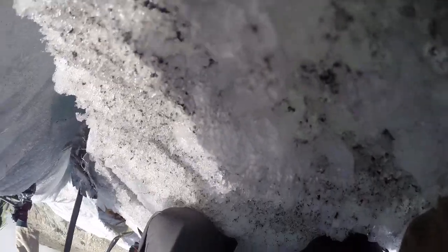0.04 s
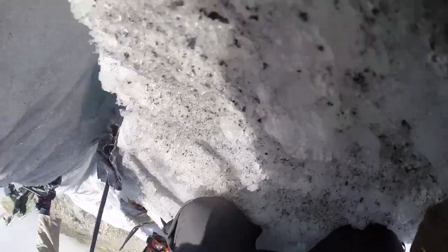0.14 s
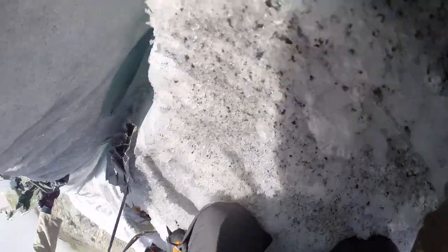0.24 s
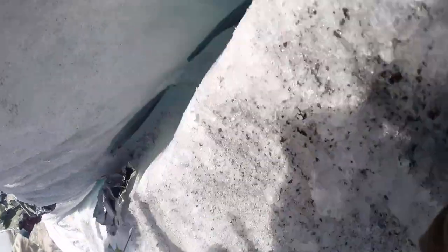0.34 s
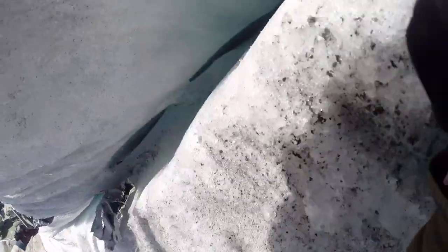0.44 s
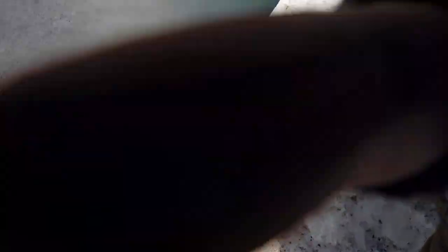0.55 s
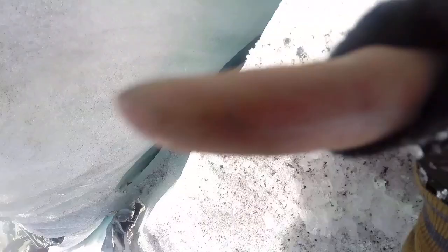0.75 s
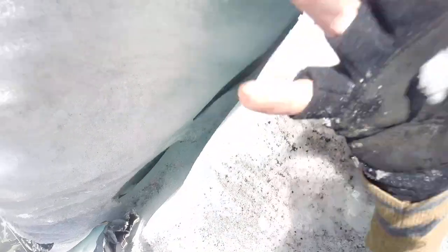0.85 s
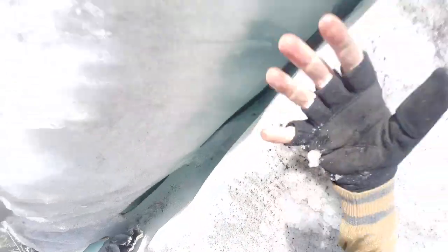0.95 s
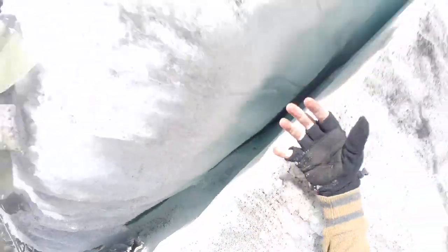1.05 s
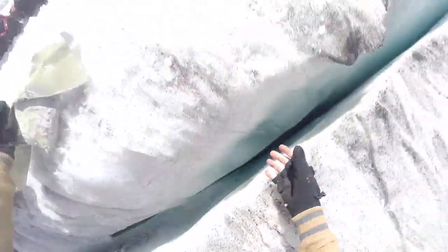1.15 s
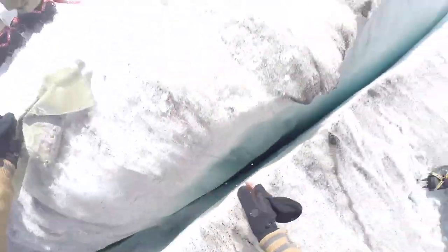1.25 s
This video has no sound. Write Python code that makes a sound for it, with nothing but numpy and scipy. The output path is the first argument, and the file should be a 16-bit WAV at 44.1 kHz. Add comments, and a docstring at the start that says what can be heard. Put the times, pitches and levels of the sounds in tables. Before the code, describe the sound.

Hollow plastic knocks rattle right against the microphone, outdoors on ice, with gritty snaps, dull bumps and a scraping glove. They follow a soft sleeve rustle and stop in under a second, leaving a faint wind rumble and distant hiss.

```python
"""On a glacier, a body-worn camera is jolted. A gloved hand and gear knock on its plastic case in quick,
clattering runs: each contact rings the shell, thuds, and snaps as grit is crushed, so close that the
hardest knocks overload. The jolts thump the microphone, the glove scrapes and a sleeve rustles.
Afterwards only a faint rumble of wind and a distant hiss are left."""
import sys
import numpy as np
from scipy import signal
from scipy.fft import rfft, irfft
from scipy.io import wavfile

SR = 44100
rng = np.random.default_rng(int(sys.argv[2]) if len(sys.argv) > 2 else 0)


def wrap_up_sound(samples):
    """Save the sound to the file named by the first command line argument, as 16-bit audio."""
    columns = np.atleast_2d(samples).T
    # keep every value between -1 and 1, then stretch to whole-number steps
    tamed = np.clip(columns, -1, 1)
    steps = np.round(tamed * 32767).astype(np.int16)
    wavfile.write(sys.argv[1], SR, steps)


N = 57330
T = np.arange(N) / SR


def from_db(db):
    """Decibels to gain."""
    return 10 ** (np.asarray(db) / 20)


def unit_rms(x):
    """Scale to an rms of one."""
    return x / np.sqrt(np.mean(x ** 2) + 1e-20)


def shaped(noise, fader, eq):
    """Colour a noise with an EQ curve, bring it to unit rms, then ride its level along a fader curve."""
    hz, db = np.transpose(eq)
    freqs = np.maximum(np.fft.rfftfreq(N, 1 / SR), 1)
    tone = from_db(np.interp(np.log(freqs), np.log(hz), db))
    low_cut = np.minimum(freqs / hz[0], 1) ** 2
    coloured = unit_rms(irfft(rfft(noise) * tone * low_cut, N))
    return from_db(np.interp(T, *np.transpose(fader))) * coloured


def butter(x, hz, kind, order=2):
    """Butterworth low-, high- or band-pass."""
    return signal.sosfilt(signal.butter(order, hz, kind, fs=SR, output="sos"), x)


def add(out, start_s, sound):
    """Mix a sound in at its start time."""
    i = int(start_s * SR)
    out[i:i + len(sound)] += sound[:N - i]


def set_attack(x, level_db, attack_s=.0035):
    """Scale a hit so that the rms of its attack sits at the given level."""
    return from_db(level_db) * x / np.sqrt(np.mean(x[:int(attack_s * SR)] ** 2))


def resonate(x, modes, scatter_db=1.85):
    """Pass a force through resonances, each a little stronger or weaker at every blow."""
    for hz, width_hz, db in modes:
        boost = from_db(db + scatter_db * rng.standard_normal())
        pole, zero = np.exp(-np.pi * width_hz / SR * np.array([1, boost]))
        tuning = 2 * np.cos(2 * np.pi * hz / SR)
        x = signal.lfilter([1, -tuning * zero, zero ** 2], [1, -tuning * pole, pole ** 2], x)
    return x


def case_knocks():
    """A chattering click rings the case and shoves it dully; crushed grit snaps and ticks on its edges."""
    # Hits on the case and their short echoes (the rows at 0.5435 and 0.5637 s, off the ice):
    # start_s, ring_db, contact_hz, width (top / bottom of the contact band, minus 1),
    # thud_db, snap_db, tick_db
    hits_and_echoes = [(0.2357, -29, 1760, 1.9, -48, -37, -67), (.2396, -27.5, 2300, 1.4, -47, -31, -36.5),
                       (.2486, -27, 2100, 0.91, -37.5, -42, -43.5),
                       (0.2528, -17, 2160, 0.54, -30, -35, -42.5),
                       (.2588, -10, 894, 0.92, -18.5, -46, -37.5),
                       (0.2625, -11, 2130, 0.44, -26.5, -33, -37.5),
                       (.2762, -43, 1500, 0.69, -61.5, -54, -43.5),
                       (0.2947, -23.5, 2730, 1.6, -42, -19.5, -39), (0.3069, -33, 2500, 1.2, -31, -61, -61),
                       (0.3111, -27.5, 1560, 1, -48.5, -48, -47), (0.3204, -29, 1450, 0.48, -60, -41, -47),
                       (.369, -22, 2010, 0.65, -46.5, -44, -54), (0.3705, -24, 2200, .7, -37, -41, -59.5),
                       (0.3767, -19, 2010, .5, -63.5, -38, -63), (.4008, -8, 2500, .45, -37.5, -55, -62),
                       (0.4055, -9.5, 2450, 0.79, -34, -49.5, -54),
                       (0.4116, -8.5, 2340, 2, -19.5, -20, -48.5), (0.459, -30, 930, .6, -31.5, -50.5, -62),
                       (0.497, -16, 1422, 0.67, -34.5, -32, -44),
                       (0.5003, -2.5, 1607, 0.43, -15.5, -24, -50),
                       (0.5357, -11.5, 1800, 1.5, -29, -24, -42.5),
                       (0.5435, -24.5, 1600, 0.6, -41, -40.5, -69),
                       (0.5541, -11, 1800, 1.12, -22, -11, -49), (0.5637, -34, 1407, .7, -46.5, -42.5, -63),
                       (0.6035, -30, 1790, 1.18, -51, -50, -77), (0.6102, -28, 1970, 1.5, -38, -35.5, -51),
                       (0.6268, -26.5, 2540, 1.2, -59, -35.5, -60),
                       (0.643, -30.5, 2130, 0.67, -68, -40.5, -73), (0.6471, -20, 2370, 0.7, -71, -49, -70),
                       (0.6574, -40, 2530, 1.2, -57, -59, -74), (0.69, -13, 1743, 1.47, -26.5, -34, -76),
                       (0.6957, -13, 1737, 2, -30, -40, -81), (0.7033, -16, 2600, .8, -30, -36, -47),
                       (.7584, -32, 1800, 2, -46.5, -80.5, -86), (0.799, -48, 1897, 1.2, -64, -77.5, -88),
                       (.812, -32.5, 1600, 1, -67, -73, -82), (.8164, -18.5, 2066, 1.8, -46, -29, -48),
                       (0.821, -32.5, 2270, 1.5, -63, -51, -77), (0.8258, -19.5, 2300, 1, -64, -50, -76),
                       (0.8289, -18.5, 1900, 1.6, -36.5, -29.5, -52),
                       (0.8365, -13, 1653, 1.2, -29.5, -35.5, -66),
                       (0.8501, -23, 2000, 1.22, -47, -43, -58), (0.8556, -25.5, 2710, 0.9, -65, -41, -74),
                       (0.8609, -27, 2730, 2.7, -48, -59, -78), (0.8632, -27, 2210, 1.1, -57, -51, -71)]
    # Body of the plastic shell: pitch_hz, width_hz, boost_db
    case_modes = [(1229, 230, 16), (1560, 160, 4), (1649.5, 85, 7.5), (1905, 90, 3), (1890, 87, -0.5),
                  (2525, 540, 8), (3110, 780, 7)]
    # Bright ring of a hard edge: pitch_hz, width_hz, boost_db
    snap_modes = [(3614, 280, 12), (4476, 300, 3), (5263, 460, 4), (5880, 670, 8.5), (6550, 150, 1)]
    # Thin overtones of that edge: pitch_hz, width_hz, boost_db
    tick_modes = [(8700, 1100, 8), (10560, 350, 4), (12700, 450, 8)]
    chatter_db, chatter_t60_s = -31, .024  # level relative to the click
    grit_db, grit_t60_s = -9.5, .01  # likewise
    out = np.zeros(N)
    t = np.arange(int(.06 * SR)) / SR
    for start_s, ring_db, contact_hz, width, thud_db, snap_db, tick_db in hits_and_echoes:
        force = rng.standard_normal(len(t)) * from_db(chatter_db - 60 * t / chatter_t60_s)
        force[0] = 1  # the click
        crunch = force + rng.standard_normal(len(t)) * from_db(grit_db - 60 * t / grit_t60_s)
        spread = np.sqrt(1 + width)
        contact = butter(force, [contact_hz / spread, contact_hz * spread], "band")
        ring = resonate(butter(contact, [900, 3180], "band", order=1), case_modes)
        snap = resonate(butter(crunch, [3277, 6840], "band", order=4), snap_modes)
        tick = resonate(butter(crunch, [8800, 12240], "band"), tick_modes)
        thud = butter(force, 853.2, "low", order=4)
        thud = butter(thud, 40, "high", order=1)
        for layer, level_db in (ring, ring_db), (thud, thud_db), (snap, snap_db), (tick, tick_db):
            add(out, start_s, set_attack(layer, level_db))
    return out


def mic_thumps():
    """Each jolt hits the microphone with a low, quickly damped swing of pressure."""
    # Jolts of the camera: start_s, level_db, pitch_hz, t60_s
    jolts = [(0.191, -21.5, 220, 0.046), (0.262, -7, 41, 0.069), (0.306, -10.5, 107, 0.058),
             (0.33, -12.5, 127, .04), (0.395, -5, 55, 0.028), (0.498, -27.5, 74.3, 0.032),
             (0.6122, -9, 65.4, 0.057), (0.835, -23, 43.4, 0.11)]
    rise_s = .0014
    attack = 1 - np.exp(-T / rise_s)
    out = np.zeros(N)
    for start_s, level_db, pitch_hz, t60_s in jolts:
        envelope = attack * from_db(level_db - 60 * T / t60_s)
        add(out, start_s, envelope * np.sin(2 * np.pi * pitch_hz * T))
    return out


def glove_rub():
    """Fibres catch and slip on the case in dense grains: a gritty midrange scrape."""
    # Strokes of the glove: time_s, level_db
    fader = [(0, -72), (.04, -75), (.06, -54), (.13, -54.5), (.22, -44), (.27, -40), (.335, -32.5),
             (.355, -37), (.39, -32.5), (.435, -39.5), (.495, -38.5), (.522, -61.5), (.545, -41),
             (.575, -49.5), (.605, -51), (.613, -40.5), (.645, -32.5), (.665, -50), (.71, -54), (.745, -58),
             (.78, -67), (.815, -48), (.87, -58), (.895, -90), (1.3, -95)]
    # Tone of the scrape: freq_hz, gain_db
    eq = [(150, -12), (400, -10.5), (900, -17), (1300, 2.5), (1650, 0.5), (2000, 4.5), (2600, -2),
          (4000, -5.5), (6200, -21.5), (7600, -19.5), (11000, -28), (15000, -33)]
    grains_per_s, spread_db, grain_share = 5400, 5.5, .99
    catches = (rng.random(N) < grains_per_s / SR) * rng.choice([-1, 1], N)
    strength = from_db(spread_db * np.minimum(rng.exponential(1, N), 5))
    grains = np.sqrt(grain_share) * unit_rms(catches * strength)
    smooth = np.sqrt(1 - grain_share) * rng.standard_normal(N)
    return shaped(grains + smooth, fader, eq)


def fabric_slide():
    """Fabric sliding fast over the case gives a thin hiss."""
    # Swipes of the fabric: time_s, level_db
    fader = [(0, -88), (.2, -52.5), (.3, -41.5), (.36, -43.5), (.39, -38), (.425, -43.5), (.475, -42),
             (.498, -39.5), (.52, -70), (.6, -67), (.618, -44.5), (.645, -50), (.68, -66), (.8, -112)]
    # Narrow treble sheen: freq_hz, gain_db
    eq = [(3000, -24.5), (4800, -8), (5900, 4), (6500, -6), (7400, -15.5), (10500, -19.5), (15000, -30.5)]
    return shaped(rng.standard_normal(N), fader, eq)


def sleeve_rustle():
    """Loose cloth rustles softly as the arm swings up."""
    # Swell of the swing: time_s, level_db
    fader = [(0, -84), (.04, -58.5), (.065, -47.5), (.13, -43.5), (.2, -37.5), (.26, -39.5), (.33, -37.5),
             (.36, -51), (.48, -55), (.53, -60), (.66, -82.5)]
    # Muffled cloth tone: freq_hz, gain_db
    eq = [(60, 9), (200, 1.5), (400, -3), (750, -5), (1000, -4), (1500, 0), (2500, -4.5), (4000, -18.5),
          (12000, -35)]
    return shaped(rng.standard_normal(N), fader, eq)


def wind_rumble():
    """Moving air and handling rumble on the microphone."""
    # Surges of the rumble: time_s, level_db
    fader = [(0, -56), (.11, -48), (.21, -35.5), (.27, -22.5), (.33, -32.5), (.43, -28.5), (.47, -35),
             (.53, -49), (.66, -38.5), (.74, -44.5), (.85, -51), (.95, -55), (1.02, -60), (1.12, -55.5),
             (1.22, -49), (1.3, -51)]
    # Sub-heavy tone: freq_hz, gain_db
    eq = [(20, 7.5), (42, 0.5), (75, -11.5), (150, -23), (300, -35), (700, -44.5), (2000, -70)]
    return shaped(rng.standard_normal(N), fader, eq)


def distant_hiss():
    """A faint, far-off hiss lies under everything."""
    # Slow drift of the bed: time_s, level_db
    fader = [(0, -65.5), (.9, -74.5), (1.02, -72.5), (1.2, -66), (1.3, -65)]
    # Soft-topped tone: freq_hz, gain_db
    eq = [(150, 11.5), (400, 5.5), (900, -1.5), (1600, -1), (2600, -1), (4000, -10), (6000, -9),
          (8000, -20.5), (15000, -25)]
    return shaped(rng.standard_normal(N), fader, eq)


def scene():
    """Close handling over wind, in open air, with a faint quick echo off the ice after two knocks."""
    handling = case_knocks() + mic_thumps() + glove_rub() + fabric_slide() + sleeve_rustle()
    return (handling + wind_rumble() + distant_hiss())[None]


def record(dry):
    """The camera soft-clips the hardest knocks and cuts the top end steeply."""
    ceiling, knee_hardness, cutoff_hz = .9, 9, 15800
    clipped = dry / (1 + np.abs(dry / ceiling) ** knee_hardness) ** (1 / knee_hardness)
    return butter(clipped, cutoff_hz, "low", order=16)


dry = scene()
out = record(dry)
wrap_up_sound(out)
```